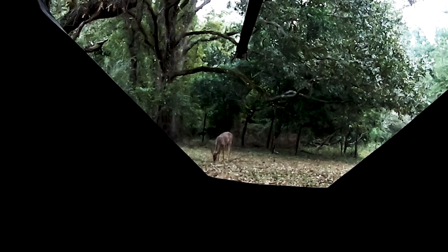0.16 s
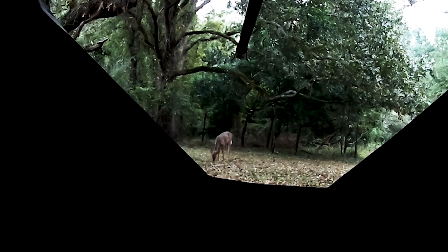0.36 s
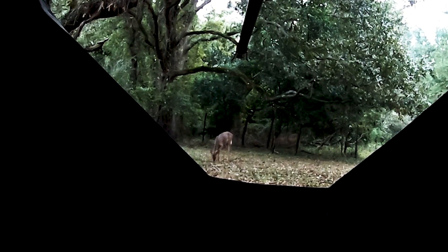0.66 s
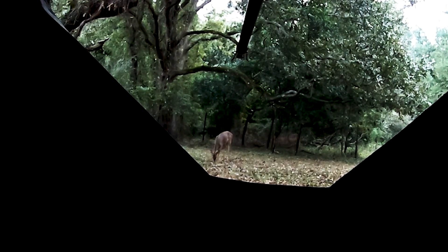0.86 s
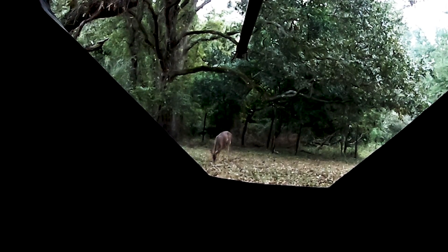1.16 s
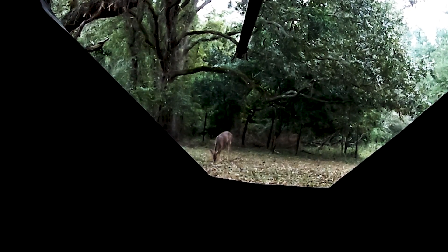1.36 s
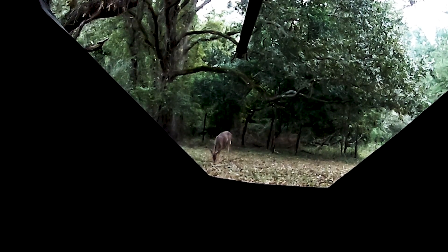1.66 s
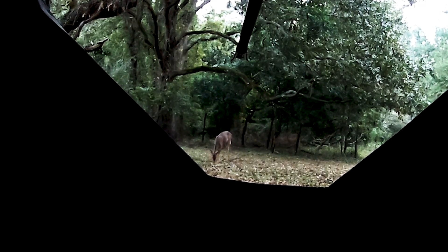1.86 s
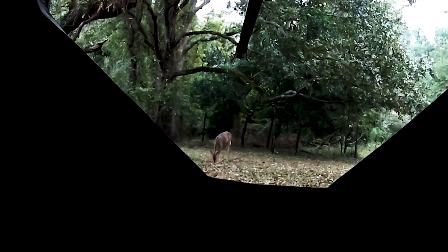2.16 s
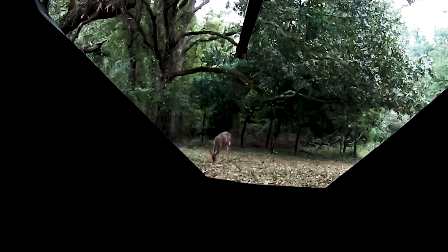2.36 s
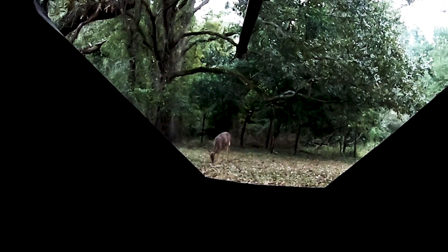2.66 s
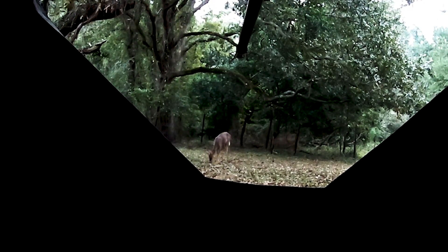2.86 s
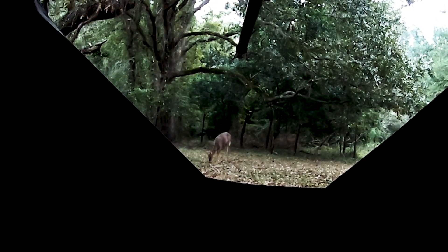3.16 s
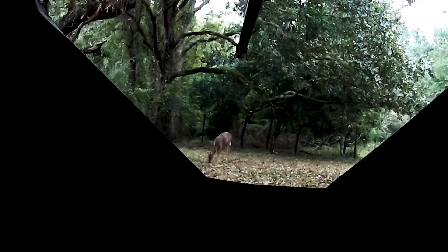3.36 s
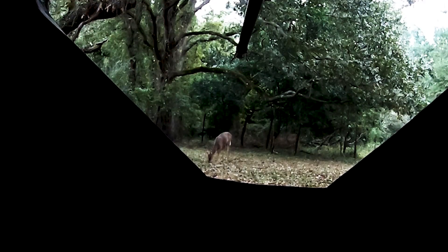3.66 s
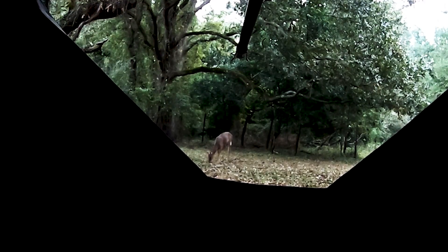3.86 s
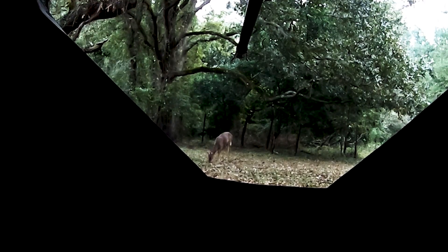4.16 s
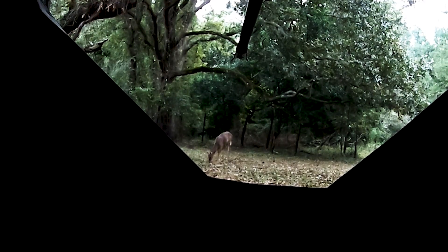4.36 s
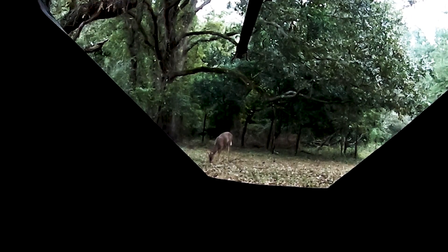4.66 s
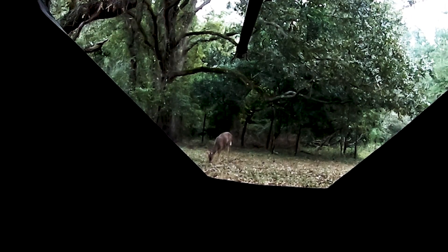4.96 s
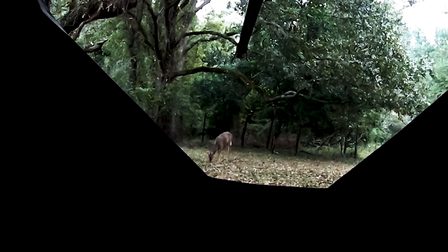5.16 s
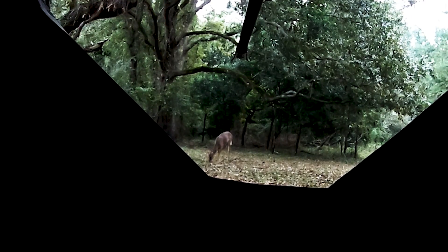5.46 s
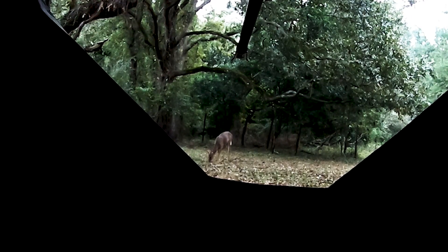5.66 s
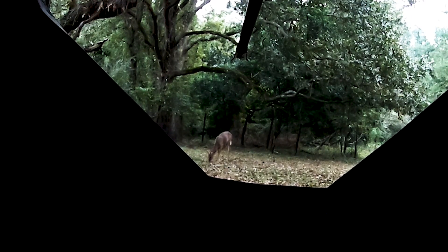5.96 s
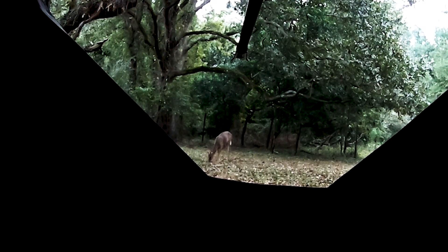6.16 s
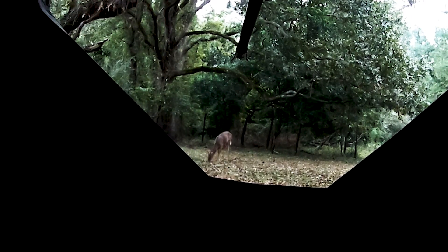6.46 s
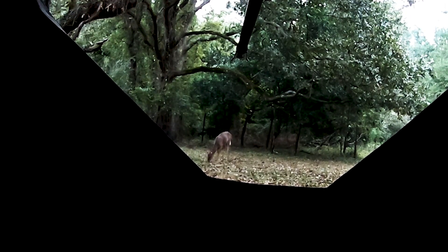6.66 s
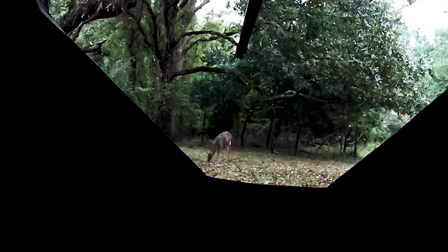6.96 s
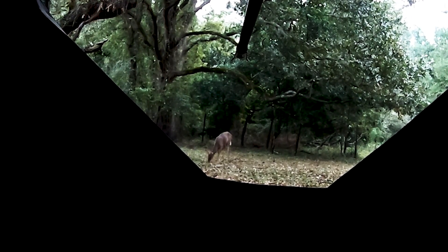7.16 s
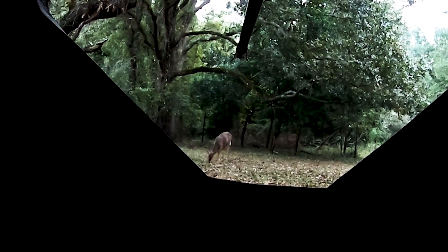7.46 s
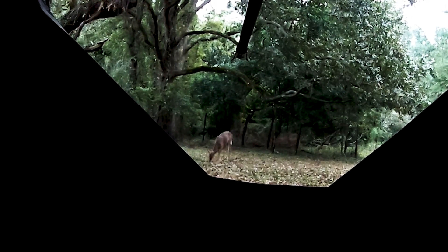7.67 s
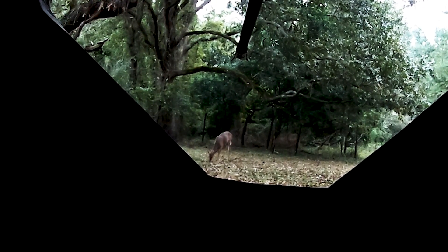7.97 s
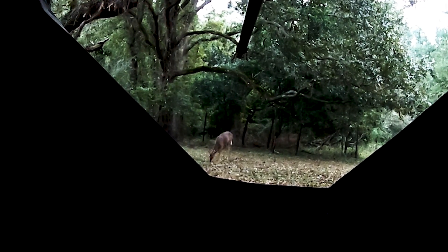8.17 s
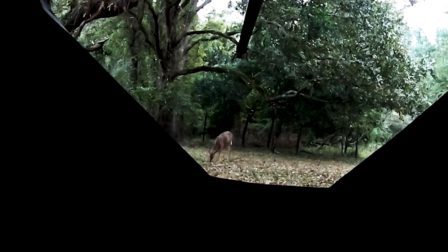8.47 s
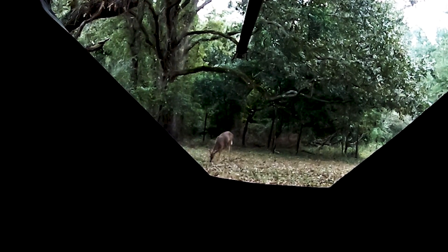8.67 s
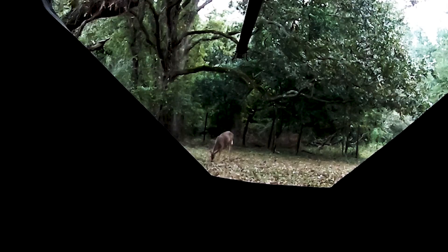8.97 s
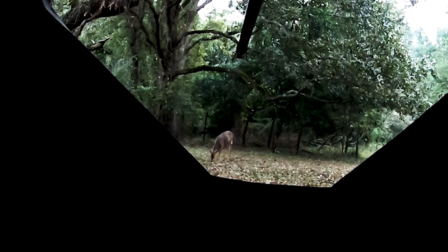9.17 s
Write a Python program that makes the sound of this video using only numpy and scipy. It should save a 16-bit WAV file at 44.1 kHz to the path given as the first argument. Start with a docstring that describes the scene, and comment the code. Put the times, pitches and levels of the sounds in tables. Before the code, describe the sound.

Near crickets trill continuously at about fifteen pulses a second, over a blurred far chorus and faint cicadas. A small bird chips, then a wren sings three quick phrases; another bird rattles faintly, and the wren repeats. Near the end comes a deep soft thump. Open woodland, stereo microphones, low traffic hum and slight hiss.

```python
"""Summer woods

Five near crickets pulse about fifteen times a second over a far chorus and cicadas; one more chirps slowly.
A wren sings two rounds of three phrases, a second bird rattles between them, a small bird chips once.
Traffic hums below air in the leaves and hiss; low thumps swing nearly opposite ways in the two channels.
Insects and birds are swept sines scattered by the woods; the diffuse layers are filtered stereo noise."""
import sys
import numpy as np
from scipy import signal
from scipy.fft import rfft, irfft
from scipy.io import wavfile
from scipy.ndimage import uniform_filter1d

SR = 44100
rng = np.random.default_rng(int(sys.argv[2]) if len(sys.argv) > 2 else 0)


def wav_out(sig):
    """Save sig, one row per channel (or a flat mono array), as 16-bit PCM at SR to the path in sys.argv[1]."""
    wavfile.write(sys.argv[1], SR, np.round(np.clip(np.atleast_2d(sig).T, -1, 1) * 32767).astype(np.int16))


N = 411012
TIME = np.arange(N) / SR


def from_db(db):
    """Decibel law: the amplitude gain of a level in dB."""
    return 10 ** (np.asarray(db) / 20)


def in_time(rows):
    """Linear interpolation: the columns of a curve table, one value per sample."""
    s, *columns = np.transpose(rows)
    return [np.interp(TIME, s, column) for column in columns]


def at_hz(points, hz):
    """Logarithmic frequency scale: a spectrum table read at any pitch."""
    table_hz, table_db = np.array(points).T
    return np.interp(np.log(hz), np.log(table_hz), table_db)


def waver(spread_db, step_s):
    """Random modulation: a gain that wanders from step to step."""
    steps = np.arange(0, TIME[-1] + 1, step_s)
    return from_db(spread_db * np.interp(TIME, steps, rng.standard_normal(len(steps))))


def diffuse(gain_at):
    """Diffuse field: stereo noise of rms 1 whose channel correlation depends on frequency."""
    # left-right correlation of diffuse sound: f/Hz, correlation (-1 to 1)
    likeness = [(40, 0.19), (150, 0.25), (300, -0.34), (500, -0.73), (800, -0.91), (1200, -0.72),
                (1700, -0.66), (2400, -0.09), (3400, 0.62), (4600, 0.48), (5500, 0.16), (7500, -0.22),
                (9000, 0.0821), (12000, 0.15)]
    hz = np.fft.rfftfreq(N, 1 / SR) + 1  # the offset avoids the logarithm of zero
    mid, side = rfft(rng.standard_normal((2, N))) * gain_at(hz)
    alike = np.clip(at_hz(likeness, hz), -1, 1)
    spectra = np.sqrt(1 + alike) * mid + np.sqrt(1 - alike) * side * [[1], [-1]]
    noise = irfft(spectra, N)
    return noise / noise.std()


def coloured(spectrum):
    """Spectral shaping: diffuse noise after a spectrum table, silent beyond its ends."""
    def gain_at(hz):
        """Band-limited filter: the gain at each frequency."""
        inside = (hz > spectrum[0][0]) * (hz < spectrum[-1][0])
        return from_db(at_hz(spectrum, hz)) * inside
    return diffuse(gain_at)


def woods(x, t60, wet_db, rise_s, stir_db=0):
    """Multiple scattering: trunks and leaves add a dying tail, another one at each microphone."""
    t = np.arange(int(.7 * SR)) / SR
    tail = rng.standard_normal((2, len(t))) * from_db(-60 * t / t60) * (1 - np.exp(-t / rise_s))
    tail *= from_db(wet_db) / np.sqrt(np.sum(tail ** 2, axis=1, keepdims=True))
    # stirring leaves blur the pitch of what is scattered
    stirred = x.mean(axis=0) * waver(stir_db, step_s=.003)
    return x + signal.oaconvolve(np.atleast_2d(stirred), tail, axes=1)[:, :N]


def add(out, s, sound):
    """Superposition: mixes a sound in at time s."""
    i = round(s * SR)
    out[:, i:i + sound.shape[1]] += sound[:, :N - i]


def whistle(rows, rough):
    """Frequency modulation: a soft-ended sine after rows of t/s, f/Hz, left and right level/dB."""
    s, hz, left_db, right_db = np.transpose(rows)
    t = np.arange(s[0], s[-1], 1 / SR)
    phase = 2 * np.pi * (rng.random() + np.cumsum(np.interp(t, s, hz)) / SR)
    # moving leaves make the level flutter, apart in each channel
    hold = 130  # samples per random step
    steps = rng.standard_normal((2, len(t) // hold + 2))
    flutter = 1 + rough * np.repeat(steps, hold, axis=1)[:, :len(t)]
    levels = from_db([np.interp(t, s, left_db), np.interp(t, s, right_db)])
    levels = levels * uniform_filter1d(flutter, size=hold)
    return levels * signal.windows.tukey(len(t), .5) * np.sin(phase)


def wing_strokes(beat, period_s, hz, droop_hz, length_s, spread_db, octave_db=-90):
    """Stridulation: one stroke a beat; the file speeds up and slows, so pitch and level arch."""
    count = np.round(beat).astype(int)
    # place within the stroke, -0.5 to 0.5
    place = np.clip((beat - count) * period_s / length_s, -.5, .5)
    # two random numbers a stroke: one for pitch, one for level
    chance = rng.standard_normal((count.max() + 9, 2))[count + 4]
    pitch = hz - droop_hz * 4 * place ** 2 + 12.0 * chance[:, 0]
    phase = 2 * np.pi * np.cumsum(pitch) / SR
    level = from_db(spread_db * chance[:, 1]) * np.cos(np.pi * place) ** 1.1
    return level * (np.sin(phase) + from_db(octave_db) * np.sin(2 * phase))


def microphone_hiss():
    """Electronic noise: a steady high band."""
    # relative spectrum of the hiss: f/Hz, gain/dB
    hiss_spectrum = [(7800, -18), (8800, -2), (9400, 2), (10500, 2.5), (11500, 2.5), (12500, 1),
                     (13500, -2), (14300, -10), (15200, -28.5)]
    return from_db(-74) * coloured(hiss_spectrum)


def leaf_air():
    """Turbulence noise: air in the leaves as a steady middle band."""
    # relative spectrum of the air: f/Hz, gain/dB
    air_spectrum = [(700, -56), (1050, 6), (1500, 5), (2100, -2), (2900, -9), (4300, -9), (5000, -10.5),
                    (6000, -19)]
    return from_db(-62) * coloured(air_spectrum)


def low_hum():
    """Low-frequency noise: a slowly fading traffic hum with random uneven bass bumps, over a low tone."""
    # relative spectrum of the hum: f/Hz, gain/dB
    hum_spectrum = [(12, -49), (20, -1.5), (33, -11), (65, -4.5), (78, -2), (109, -15), (142, -2),
                    (168, 2.5), (209, -2), (288, -12), (452, -12.5), (562, -17.5), (633, -12), (813, -6.5),
                    (1100, -25.5), (1430, -35), (2420, -120)]
    level_db, fade_db_per_s = -46, -0.2039
    bass_top_hz, tone_hz, tone_db = 110, 31, -66
    hum = coloured(hum_spectrum)
    bass = signal.sosfiltfilt(signal.butter(2, bass_top_hz, fs=SR, output="sos"), hum)
    bass_bumps = (waver(spread_db=2, step_s=.1) - 1) * bass
    balance = from_db([[-.5], [.5]])  # left, right
    tone = from_db(tone_db) * np.sin(2 * np.pi * tone_hz * TIME)
    return tone + from_db(level_db + fade_db_per_s * TIME) * (hum + bass_bumps) * balance


def cicadas():
    """Body resonance: too far for single clicks, so resonant noise that throbs unevenly."""
    # body resonances: f/Hz, width/Hz, relative level/dB
    resonances = [(3546.8, 380, -4), (3250, 690.5, -14)]
    # level of the whole band, swelling where birdsong rings on in it, before the lift below:
    # t/s, level/dB
    band_level = [(0.0, -68.5), (2.2, -66.5), (3.4, -67.5), (3.95, -69.5), (4.3, -66), (5.2, -66.5),
                  (5.55, -69), (6.4, -64.5), (7.2, -67.5), (9.32, -70.5)]
    lift_db = 5.5

    def gain_at(hz):
        """Resonance curves: the sum of the bands at each frequency."""
        return sum(from_db(db) / (1 + (2 * (hz - top_hz) / wide_hz) ** 2)
                   for top_hz, wide_hz, db in resonances)

    level = from_db(in_time(band_level)[0] + lift_db)
    return level * waver(spread_db=1.0, step_s=.05) * diffuse(gain_at)


def far_chorus(count):
    """Superposition of many sources: weaker single singers stand out of the blur of all the rest."""
    # relative spectrum of the chorus: f/Hz, gain/dB
    chorus_spectrum = [(4900, -38), (5300, -27.5), (5550, -17), (5800, -7.5), (6050, -4.5), (6350, -2.5),
                       (6600, -8.5), (6850, -10), (7200, -18.5), (7600, -26.5), (8000, -33.5), (8600, -57)]
    level_db, fade_db_per_s = -44.5, -0.057
    singers = np.zeros((2, N))
    for rate_pick, pitch_pick, beat_start, side_pick in rng.random((count, 4)):
        rate, hz = 13.5 + 2.5 * rate_pick, 5750 + 1000 * pitch_pick
        song = wing_strokes(TIME * rate + beat_start, 1 / rate, hz, droop_hz=150.3,
                            length_s=.03, spread_db=2.5)
        side_db = 6.0 * (side_pick - .5) * np.array([[1], [-1]])
        singers += from_db(at_hz(chorus_spectrum, hz) + side_db) * song
    singers = woods(singers, t60=0.65, wet_db=0.5, rise_s=.006)
    blend = coloured(chorus_spectrum) + from_db(-8) * singers / singers.std()
    return from_db(level_db + fade_db_per_s * TIME) * blend


def slow_cricket():
    """Random frequency modulation: short rough chirps, about two a second, waver about one pitch."""
    # chirps: t/s, left level/dB
    chirp_times = [(0.124, -63), (.63, -59), (1.16, -62), (1.74, -58), (2.22, -55), (2.72, -56),
                   (3.23, -58), (3.71, -68), (4.17, -61), (4.67, -63), (5.2, -60), (5.677, -58),
                   (6.158, -56.5), (6.602, -54), (7.104, -55), (7.646, -62), (8.12, -59), (8.65, -66),
                   (9.095, -71)]
    length_s, pitch_hz, waver_hz, right_offset_db = 0.25, 5550, 45, -11
    out = np.zeros((2, N))
    for s, level_db in chirp_times:
        t = np.linspace(0, length_s, num=16)
        hz = pitch_hz + waver_hz * rng.standard_normal(len(t))
        left_db = np.full(len(t), level_db)
        rows = np.transpose([t, hz, left_db, left_db + right_offset_db])
        add(out, s, whistle(rows, rough=.9))
    return out


def bout_gate():
    """Amplitude gating: 1 during each bout of song, 0 between, with short ramps."""
    # bouts of the third near cricket: start t/s, end t/s
    bout_times = [(0, 2.64), (3.99, 6.54), (7.82, 9.2)]
    fade_s = 0.055
    gate = np.zeros(N)
    for start, end in bout_times:
        # a bout that starts at zero is already under way
        rise = np.clip((TIME - start) / fade_s + .5 + (start == 0), 0, 1)
        fall = np.clip((end - TIME) / fade_s + .5, 0, 1)
        gate += rise * fall
    return gate


def near_crickets():
    """Interchannel delay: each has its own beat, pitch and direction; the ground returns one echo."""
    # pulse rate of each cricket before its drift: rate/Hz
    pulse_rates = [14.9, 14.5, 14.5, 15.25, 14.05]
    # pulses: top f/Hz, droop at the pulse ends/Hz, length t/s, lag of the left channel/ms
    pulse_shapes = [(6070, 330, .028, .222), (6020, 170, .030, .23), (6395, 200, .024, .0),
                    (6550, 170, .026, .25), (6190, 120, .017, .25)]
    # lateness against an even beat: at the start t/ms, change/(ms/s)
    beat_drift = [(-23.5, .45), (3.5, .2), (-22.5, -1.1), (-16, .3), (31.5, -.9)]
    # direct sound, before the bout lift: left level/dB, right level/dB
    cricket_levels = [(-33.5, -35), (-34, -36.5), (-43, -43), (-43.5, -40.5), (-66, -42)]
    bout_lift_db, overtone_db, echo_s, echo_db = 3.5, -36.5, .017, -11
    out = np.zeros((2, N))
    for k, (hz, droop_hz, length_s, lag_ms) in enumerate(pulse_shapes):
        start_ms, drift_ms_per_s = beat_drift[k]
        late_ms = start_ms + drift_ms_per_s * TIME
        beat = (TIME - late_ms / 1000) * pulse_rates[k]
        octave_db = overtone_db if k == 0 else -90
        song = wing_strokes(beat, 1 / pulse_rates[k], hz, droop_hz, length_s, 0.5, octave_db)
        if k == 2:
            song = song * from_db(bout_lift_db) * bout_gate()
        # a linear phase shift delays by a fraction of a sample
        delay = np.exp(-2j * np.pi * np.fft.rfftfreq(N, 1 / SR) * lag_ms / 1000)
        late_song = irfft(rfft(song) * delay, N)
        out += from_db(cricket_levels[k])[:, None] * [late_song, song]
    out += from_db(echo_db) * np.roll(out, round(echo_s * SR), axis=1)
    return woods(out + slow_cricket(), t60=0.41, wet_db=-16.5, rise_s=0.0024)


def thumps():
    """Opposed phase: low swelling cycles over a dying rumble, weaker and slightly delayed at the left."""
    # thumps: t/s, f/Hz, length t/s, peak level/dB at the right, rumble level/dB before its envelope
    thump_rows = [(5.422, 76.4, 0.07, -35, -47), (8.557, 73.4, 0.1, -12, -41.5),
                  (8.676, 72.2, 0.095, -25, -51.5), (8.762, 70.6, 0.07, -35, -63)]
    # a lag of about half a cycle makes the channels swing nearly opposite ways
    octave_db, left_db, left_lag_s = -31, -10.0, .0066
    out = np.zeros((2, N))
    rumble_band = signal.butter(4, [28, 180], "band", fs=SR, output="sos")
    for s, hz, length_s, level_db, rumble_db in thump_rows:
        t = np.arange(0, .3, 1 / SR)
        swell = np.sin(np.pi * np.clip(t / length_s, 0, 1) ** 0.6) ** 2.2
        phase = 2 * np.pi * hz * t
        boom = from_db(level_db) * swell * (np.sin(phase) + from_db(octave_db) * np.sin(2 * phase))
        rumble = signal.sosfilt(rumble_band, rng.standard_normal((2, len(t))))
        envelope = (t / 0.012) * np.exp(1 - t / 0.031)
        add(out, s, from_db(rumble_db) * rumble / rumble.std() * envelope)
        add(out[1:], s, boom[None])
        add(out[:1], s + left_lag_s, from_db(left_db) * boom[None])
    return out


def rattle():
    """Periodic repetition: a row of quick rising sweeps, loudest in the middle."""
    # one sweep: t/s, f/Hz, relative left level/dB, relative right level/dB
    sweep = [(0, 3800, -2, -2), (.011, 4480, 0, 0), (.026, 5100, -4, -4)]
    start_s, period_s, count = 4.120, .0675, 17
    level_db, middle_s, edge_s, edge_db = -63, 4.72, 0.58, -13
    out = np.zeros((2, N))
    for s in start_s + period_s * np.arange(count):
        arch_db = edge_db * ((s - middle_s) / edge_s) ** 4
        sweep_db = level_db + arch_db + 1.2 * rng.standard_normal()
        add(out, s, from_db(sweep_db) * whistle(sweep, rough=.7))
    return out


def chip():
    """Linear frequency sweep: one small call made of a few rising strokes."""
    # strokes: t/s, from f/Hz, to f/Hz, length t/s, left level/dB
    strokes = [(1.98, 6700, 7260, 0.0213, -47.5), (1.998, 7250, 7950, 0.01, -61),
               (2.018, 6800, 7200, 0.0256, -55)]
    out = np.zeros((2, N))
    for s, from_hz, to_hz, length_s, level_db in strokes:
        rows = [(0, from_hz, 0, -3), (length_s, to_hz, 0, -3)]
        add(out, s, from_db(level_db) * whistle(rows, rough=0.76))
    return out


def far_birds():
    """Reverberant distance cue: the rattle and the chip, farther away, reach us largely scattered."""
    scattered = woods(rattle() + chip(), t60=.13, wet_db=2, rise_s=.003, stir_db=4)
    return woods(scattered, t60=0.84, wet_db=-0.5, rise_s=0.0049, stir_db=6.5)


def wren_note(length_s, from_hz, to_hz, glide_s, left_db, right_db, tilt_db):
    """Exponential glide: the pitch closes in on its goal, wavering, while the note fades a little."""
    waver_hz, fade_db_per_s, tilt_from_hz = 60, -120, 3200
    t = np.linspace(0, length_s, num=12)
    glide_hz = to_hz + (from_hz - to_hz) * np.exp(-t / glide_s)
    hz = glide_hz + waver_hz * rng.standard_normal(len(t))
    # the tilt acts on the octaves above its lowest pitch
    db = fade_db_per_s * t + tilt_db * np.maximum(np.log2(hz / tilt_from_hz), 0)
    return whistle(np.transpose([t, hz, left_db + db, right_db + db]), rough=.45)


def wren_song():
    """Source directivity: phrases from one pattern, their treble tilting as the bird turns its head."""
    # notes of a phrase: t/s into it, length t/s, from f/Hz, to f/Hz, glide time t/s,
    # relative left level/dB, relative right level/dB
    notes = [(-.004, .014, 5400, 4700, .010, -19, -19), (.002, .014, 3700, 4050, .008, -14, -24),
             (.011, .022, 2300, 3230, .002, -10, -19), (.021, .019, 3230, 3160, .010, -11, -7),
             (.030, .016, 3100, 2500, .012, -12, -21), (.046, .028, 2900, 4400, .017, -9, -14),
             (.070, .028, 3950, 4300, .014, -18, -18), (.106, .020, 5750, 3900, .014, -8, -10),
             (.128, .033, 3230, 3170, .014, -14, -11), (.152, .051, 3200, 2430, .006, -8, -15),
             (.229, .027, 2600, 2860, .008, -8, -17), (.250, .050, 2750, 900, .040, -8, -9)]
    # phrases: t/s, level/dB added to the notes, treble tilt/(dB/octave), change of the opening/dB,
    # pause before the closing notes t/s
    phrases = [(2.173, -42.5, 8, -7, 0), (2.53, -40.5, 1, -1.5, 0), (2.8911, -42, 6, 2.5, 0.0078),
               (5.774, -45, 4, -2.5, 0.0023), (6.133, -44, 6, -0.5, 0.0038), (6.503, -43.5, 0, 0.5, 0.0089)]
    warm_up_s, closing_s = .13, .22
    out = np.zeros((2, N))
    for s, level_db, tilt_db, opening_db, pause_s in phrases:
        for into_s, *note in notes:
            opening = max(1 - (into_s / warm_up_s) ** 2, 0)
            db = level_db + opening_db * opening + 1.5 * rng.standard_normal()
            start_s = s + into_s + pause_s * (into_s > closing_s)
            add(out, start_s, from_db(db) * wren_note(*note, tilt_db))
    return out


def wren():
    """Reflection and interference: one echo off the far trees, and a pitch lifted by the ground."""
    echo_s, echo_db, left_lag_s = .055, -15, .00027
    lift_hz, lift_width_hz, lift_db = 3190, 350, 7
    song = wren_song()
    song = song + from_db(echo_db) * np.roll(song, round(echo_s * SR), axis=1)
    song = np.array([np.roll(song[0], round(left_lag_s * SR)), song[1]])
    # on the direct path a ground reflection lifts the song around one pitch
    b, a = signal.iirpeak(lift_hz, lift_hz / lift_width_hz, SR)
    # the tiny offset keeps the filter clear of slow, vanishing numbers
    lift = from_db(lift_db) * signal.lfilter(b, a, song + 1e-18)
    scattered = woods(song, t60=.19, wet_db=3, rise_s=.003, stir_db=6)
    return lift + woods(scattered, t60=1.0, wet_db=-5.5, rise_s=0.019, stir_db=10.0)


def scene():
    """Superposition: all layers at the two microphones."""
    background = microphone_hiss() + leaf_air() + low_hum()
    insects = cicadas() + far_chorus(count=12) + near_crickets()
    return background + insects + thumps() + far_birds() + wren()


def record(dry):
    """Low-pass filtering: the top is cut steeply, 60 dB down from the stopband edge."""
    stopband_hz = 15200
    return signal.sosfilt(signal.cheby2(12, 60, stopband_hz, fs=SR, output="sos"), dry)


dry = scene()
out = record(dry)
wav_out(out)
```